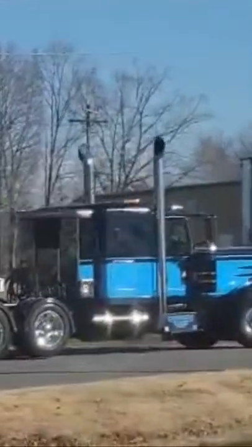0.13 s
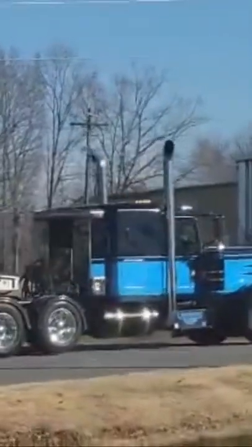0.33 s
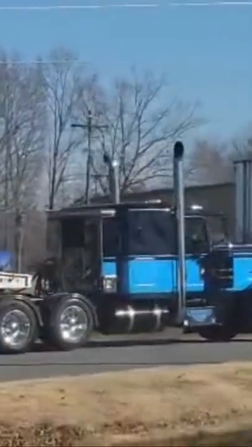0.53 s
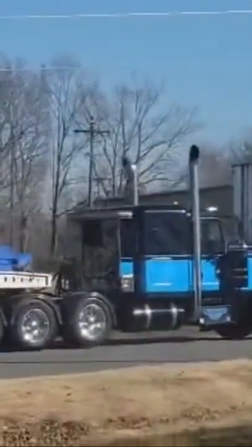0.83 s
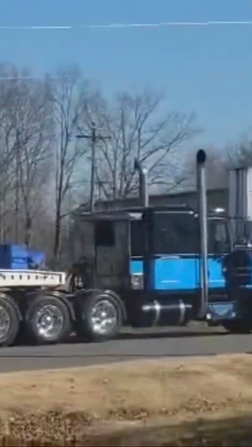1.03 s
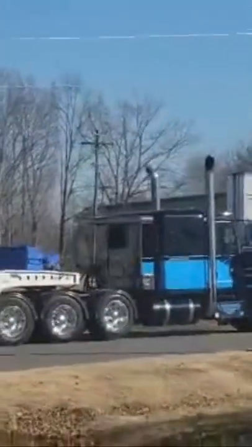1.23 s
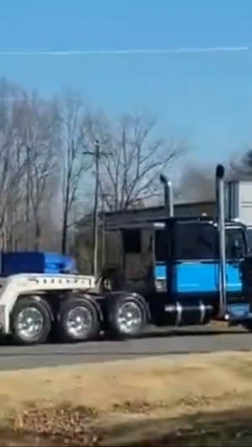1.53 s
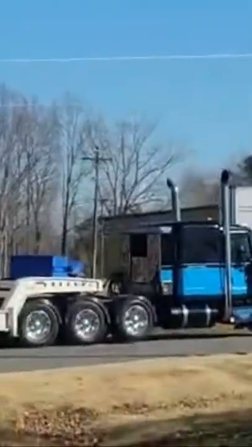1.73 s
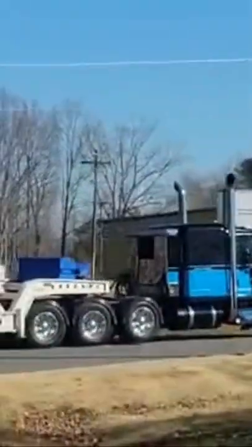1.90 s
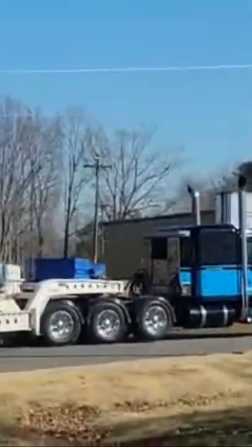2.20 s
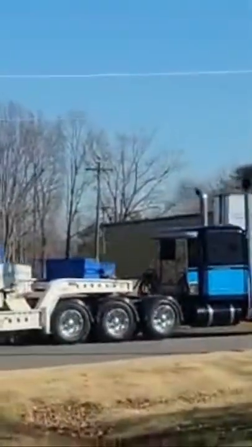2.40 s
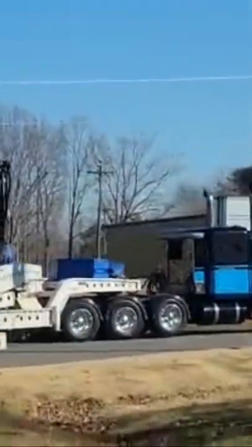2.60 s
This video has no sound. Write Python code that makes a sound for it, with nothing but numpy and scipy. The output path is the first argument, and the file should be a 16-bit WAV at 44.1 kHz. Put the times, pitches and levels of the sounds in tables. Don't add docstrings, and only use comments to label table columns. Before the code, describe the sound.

A big diesel truck rolls slowly by, its uneven low exhaust chugging with rasp and metallic clatter

```python
import sys
import numpy as np
from scipy import signal
from scipy.fft import rfft, irfft, next_fast_len
from scipy.io import wavfile
from scipy.ndimage import uniform_filter1d, map_coordinates

SR = 44100
rng = np.random.default_rng(int(sys.argv[2]) if len(sys.argv) > 2 else 0)


def generate_wav(sig):
    pcm = np.round(np.clip(np.atleast_2d(sig).T, -1, 1) * 32767).astype(np.int16)
    wavfile.write(sys.argv[1], SR, pcm)


def magnitude_from_level(level_db):
    exponent = np.asarray(level_db, float) / 20
    return 10 ** exponent


N = 121275

CYCLE_HZ, FIRST_FIRING_S = 4.974, -.0017
IN_NEAR_BANK = [1, 0, 1, 1, 0, 1, 0, 0]
# (time [s], crank lag behind even turning [ms])
GOVERNOR_HUNT = [(-.1, 8), (.05, 5.7), (.47, 0), (.75, -.25), (.95, .5), (1.15, 0), (1.25, .15),
                 (1.75, -.45), (2.05, 0), (2.3, .8), (2.48, 2.2), (2.65, 0), (2.8, -1.5)]

FIRING_DB = [3.2, -4.5, .6, -6, 2.1, 2.2, -4.2, 6.7]
# (centre [Hz], width [Hz], level [dB])
NEAR_STACK = [(39.9, 7.2, -35.8), (62.2, 4, -23.5), (123.5, 58, -54.4)]
# (centre [Hz], width [Hz], level [dB])
FAR_STACK = [(59.5, 4, -29.8), (77.7, 12.9, -40.3), (100, 9.6, -45.6)]
# (centre [Hz], width [Hz], level [dB])
RASP_MODES = [(130, 33.4, 0), (178, 26.1, 0.5), (227.2, 22.5, -4.5), (277.4, 60.6, -8.5), (403, 107.5, -17),
              (798, 13, -20)]
EDGE_DB = [-1, -1, 1, -1.5, 3, -4, -4, 1.5]
EXHAUST_JITTER_S, EXHAUST_SCATTER_DB = .0001, .3
EDGE_JITTER_S, EDGE_SCATTER_DB, RASP_LATE_S = .0001, 1.5, -.002

# (centre [Hz], width [Hz], level [dB])
NEAR_PIPE = [(116.3, 12.3, -40), (123.17, 19.9, -43.7), (162.23, 8, -42), (240.1, 27.35, -51.8),
             (331.2, 8, -63.2)]
# (centre [Hz], width [Hz], level [dB])
FAR_PIPE = [(140.4, 8, -50.8), (170.13, 10.7, -40), (162, 28.5, -43.65), (203.4, 19, -50.5),
            (254.7, 8, -52.4)]
BLOWDOWN_DB = [-1.4, 1.8, 4.2, .8, 7.1, -.4, -2.3, -3.85]
RUNNER_MS = [5.19, -4.53, -6.27, -4.15, -4.57, -6.79, -4.88, -4.37]

# (time [s], level [dB])
BLOCK_PASS = [
    (.15, -51),
    (.6, -51),
    (1.302, -52.5),
    (2.2, -53.5),
    (2.601, -53),
]
# (centre [Hz], width [Hz], level [dB])
BLOCK_MODES = [(1703, 160, -7.5), (2020, 49.6, 3.5), (2350, 20, -1), (2984, 75, -6), (3367, 17, -2.5),
               (3676, 74, -11), (4018, 77, -10), (4360, 474, -19), (4970, 52, -14.5), (5200, 61, -30)]
KNOCK_DB = [3, -5.5, 3.5, -10, 0.5, -10, -3, -10.5]
TICK_DB = [-1, -1, 0.5, -5, -5, -6, -2, -5]
# (frequency [Hz], density [dB per Hz])
FIZZ_SPECTRUM = [(1000, -48.5), (1700, -1), (2010, -9.5), (2580, -7.5), (3300, -12.5), (5040, -30.5),
                 (5580, -19.5), (7840, -24.5), (12900, -45), (16800, -67), (22000, -120)]
# (centre [Hz], width [Hz], level [dB])
OIL_PAN_MODES = [(555.6, 22, -3.5), (487, 80, -7)]
# (frequency [Hz], level over block [dB], decay t60 [s])
PINGS = [(1263, 10, .1), (1322, 6, 0.11), (1101, 3.5, 0.095), (1166, 6, 0.099), (5220, -6.5, 0.073),
         (3420, 1.5, 0.036), (3950, -3.5, 0.07), (6770, -14.5, 0.059), (4970, -14, 0.031),
         (1790, -2.5, 0.044), (6400, -17, 0.082), (2780, -1, 0.044), (5140, -18, 0.047), (4480, -8.5, 0.11)]
PING_LATE_S = [.154, .156, .127, .138, .025, .047, .048, .05, .149, .153, .196, .196, .103, .052]
PATCHY_DB, CLATTER_LATE_S = 2.3, -.001

# (frequency [Hz], level [dB])
HUM_TONES = [(33.92, -50), (67.84, -36), (96.3, -45), (123.7, -43), (135.7, -37), (203.4, -50),
             (333.6, -53)]
# (frequency [Hz], density [dB per Hz])
ROAD_SPECTRUM = [(15, -69), (30, -23), (60, -15), (97, -2), (130, -1.5), (200, -6.5), (300, -9),
                 (520, -17.5), (660, -25), (1300, -29), (1500, -35.5), (1900, -40), (3000, -42.5),
                 (6000, -120)]
# (centre [Hz], width [Hz], mean share lost [0-1])
ECHO_GAPS = [(1520, 90, .55), (2600, 90, .65), (3800, 60, .35), (4220, 70, .55), (4650, 70, .55),
             (5450, 90, .6), (5800, 70, .4), (6080, 70, .35), (6700, 80, .35), (250, 14, .45)]
# (frequency [Hz], correlation [0-1])
ALIKE = [(60, 0.99), (170, 0.99), (510, 0.51), (1480, 0.25), (4290, 0.3), (12500, 0.09)]
# (frequency [Hz], left lead [rad])
PORT_LEAD = [(40, 0.99), (70, 0.084), (150, 0.5), (230, -.3), (330, 0.68), (550, -0.94), (900, 1)]
# (frequency [Hz], left minus right [dB])
PORT_TILT = [(60, -0.5), (170, 0.0), (510, 1), (1480, 3), (4290, 0), (12500, 2)]


def unit(x):
    return x / np.sqrt(np.mean(x ** 2) + 1e-20)


def along(points, hz):
    f, value = np.transpose(points)
    return np.interp(np.log(hz + 1), np.log(f + 1), value)


def wobble(rate_hz):
    knots = rng.standard_normal(int(N * rate_hz / SR) + 4)
    return map_coordinates(knots, [np.arange(N) * rate_hz / SR])


def filtered(x, response):
    m = next_fast_len(x.shape[-1] + SR)
    return irfft(rfft(x, m) * response(np.fft.rfftfreq(m, 1 / SR)), m)[..., :x.shape[-1]]


def resonances(modes, widen=1):
    def response(f):
        total = 0
        for k, (centre_hz, width_hz, db) in enumerate(modes):
            damping = 1j * f * width_hz * widen
            total = total + (-1) ** k * magnitude_from_level(db) * damping / (centre_hz ** 2 - f * f + damping)
        return total
    return response


def high_pass(f, corner_hz, order):
    return (1j * f / (1j * f + corner_hz)) ** order


def firings(sizes, late_s, jitter_s, scatter_db):
    k = np.arange(-32, int(8 * CYCLE_HZ * N / SR))
    chance = rng.standard_normal((len(k), 2))
    s = 1 + k / len(IN_NEAR_BANK) / CYCLE_HZ + FIRST_FIRING_S + late_s + jitter_s * chance[:, 0]
    s = s + np.interp(s - 1, *np.transpose(GOVERNOR_HUNT)) / 1000
    size = np.asarray(sizes)[k % len(IN_NEAR_BANK)] * magnitude_from_level(scatter_db * chance[:, 1])
    return np.bincount(np.round(s * SR).astype(int), size, N + 2 * SR)[:N + SR]


def gate(sizes, late_s, decay_s, rest):
    t = np.arange(SR // 10) / SR
    rise_s = .0015
    shape = (1 - np.exp(-t / rise_s)) * np.exp(-t / decay_s)
    hits = firings(sizes, late_s, jitter_s=.0042, scatter_db=2.5)
    return rest + signal.fftconvolve(hits, shape)[SR:N + SR]


def rush(response, patchy_db, loudness=1):
    z = signal.stft(rng.standard_normal((2, N)), nperseg=512)[2]
    field = uniform_filter1d(rng.standard_normal(z.shape[1:]), size=6, axis=0)
    field = uniform_filter1d(field, size=8, axis=1)
    patchy = signal.istft(z * magnitude_from_level(patchy_db * unit(field)), nperseg=512)[1][:, :N]

    def mid_side(hz):
        turn = np.arccos(np.clip(along(ALIKE, hz), -1, 1)) / 2
        return response(hz) * np.array([np.cos(turn), np.sin(turn)])

    mid, side = filtered(loudness * patchy, mid_side)
    return unit(np.array([mid + side, mid - side]))


def stacks():
    bank, size = np.array(IN_NEAR_BANK), magnitude_from_level(FIRING_DB) * SR / (2 * CYCLE_HZ)
    near_pulses = firings(size * bank, 0, EXHAUST_JITTER_S, EXHAUST_SCATTER_DB)
    far_pulses = firings(size * (1 - bank), .0078, EXHAUST_JITTER_S, EXHAUST_SCATTER_DB)
    both = filtered(near_pulses, resonances(NEAR_STACK)) + filtered(far_pulses, resonances(FAR_STACK))
    muffler_hz = 287
    muffled = filtered(both, lambda f: 1 / (1 + (f / muffler_hz) ** 4))[SR:]
    return magnitude_from_level(0.9 + 0.2 * wobble(0.47)) * muffled


def rasp_response(f):
    top_hz = 850
    return resonances(RASP_MODES)(f) / (1 + (f / top_hz) ** 4) * high_pass(f, 110, 2)


def exhaust_rasp():
    edges = firings(magnitude_from_level(EDGE_DB), RASP_LATE_S, EDGE_JITTER_S, EDGE_SCATTER_DB)
    low_hz = 270
    rasp = filtered(edges, lambda f: rasp_response(f) / (1 + (low_hz / (f + 1)) ** 6))
    return magnitude_from_level(-47.5) * unit(rasp[SR:])


def exhaust_puffs():
    flow = gate(np.ones(len(IN_NEAR_BANK)), RASP_LATE_S, decay_s=.0034, rest=.31)
    return magnitude_from_level(-35.5) * rush(rasp_response, PATCHY_DB, flow)


def pipes():
    blows = []
    for db, ms, one in zip(BLOWDOWN_DB, RUNNER_MS, np.eye(len(IN_NEAR_BANK))):
        size = magnitude_from_level(db) * one * SR / (2 * CYCLE_HZ)
        blows.append(firings(size, ms / 1000, EXHAUST_JITTER_S, EXHAUST_SCATTER_DB))
    near, far = np.dot(IN_NEAR_BANK, blows), np.dot(1 - np.array(IN_NEAR_BANK), blows)
    both = filtered(near, resonances(NEAR_PIPE)) + filtered(far, resonances(FAR_PIPE))
    return filtered(both, lambda f: high_pass(f, 110, 2) / (1 + (f / 400) ** 4))[SR:]


def block_knock():
    strikes = gate(magnitude_from_level(KNOCK_DB), CLATTER_LATE_S, decay_s=.0023, rest=.37)
    ring = lambda f: resonances(BLOCK_MODES, widen=1.25)(f) * high_pass(f, 1500, 3)
    return magnitude_from_level(-2.5) * rush(ring, PATCHY_DB, strikes)


def injector_fizz():
    spray = gate(magnitude_from_level(TICK_DB), CLATTER_LATE_S, decay_s=.012, rest=.8)
    return magnitude_from_level(-5.5) * rush(lambda f: magnitude_from_level(along(FIZZ_SPECTRUM, f)), PATCHY_DB, spray)


def tappet_pings():
    t, once = np.arange(SR // 8) / SR, np.eye(len(IN_NEAR_BANK))[0]
    rise = 1 - np.exp(-t / .002)
    mono = 0
    for late_s, (hz, db, t60_s) in zip(PING_LATE_S, PINGS):
        ring = magnitude_from_level(db - 60 * t / t60_s) * rise * np.sin(2 * np.pi * hz * t)
        strikes = firings(once, late_s, jitter_s=.0011, scatter_db=1.5)
        mono = mono + signal.fftconvolve(strikes, ring)[SR:N + SR]
    return mono * np.array([[1.12], [.88]])


def oil_pan():
    thumps = firings(np.ones(len(IN_NEAR_BANK)), 0, EDGE_JITTER_S, EDGE_SCATTER_DB)
    return magnitude_from_level(-52) * unit(filtered(thumps, lambda f: resonances(OIL_PAN_MODES)(f) ** 2)[SR:])


def block():
    s, db = np.transpose(BLOCK_PASS)
    nearness = magnitude_from_level(np.interp(np.arange(N) / SR, s, db))
    return nearness * (block_knock() + injector_fizz() + tappet_pings()) + oil_pan()


def hum():
    t = np.arange(N) / SR - .0107
    total = 0
    for hz, db in HUM_TONES:
        level = np.sqrt(2) * magnitude_from_level(db + 1.5 * wobble(1.4))
        drift_rad = .15 * wobble(1.1)
        total = total + level * np.cos(2 * np.pi * hz * t + drift_rad)
    return total


def road():
    return magnitude_from_level(-33.5) * rush(lambda f: magnitude_from_level(along(ROAD_SPECTRUM, f)), patchy_db=1.2)


def echo_losses(dry):
    lost = 0
    for hz, width_hz, share in ECHO_GAPS:
        depth = np.clip(share + .45 * wobble(11), 0, 1)
        lost = lost + depth * filtered(dry, lambda f: np.exp(-((f - hz) / width_hz) ** 2))
    return lost


def scene():
    exhaust = stacks() + exhaust_rasp() + exhaust_puffs()
    dry = exhaust + pipes() + block() + hum() + road()
    return dry - echo_losses(dry)


def band_limit(x):
    return signal.sosfilt(signal.butter(12, 13090, fs=SR, output="sos"), x)


def record(dry):
    side = np.array([[.5], [-.5]])

    def ports(f):
        balance = magnitude_from_level(side * along(PORT_TILT, f))
        phase = np.exp(1j * side * along(PORT_LEAD, f))
        return high_pass(f, 20, 2) * balance * phase

    return band_limit(filtered(dry, ports))


dry = scene()
out = record(dry)
generate_wav(out)
```